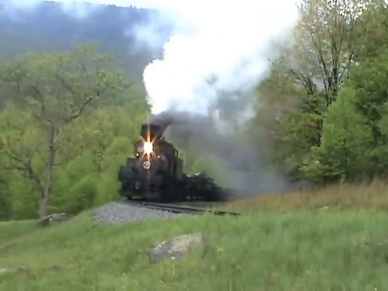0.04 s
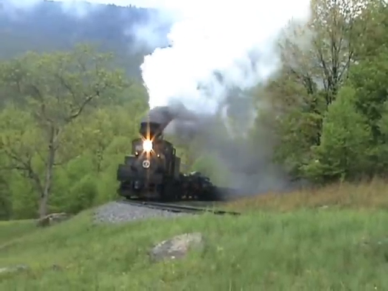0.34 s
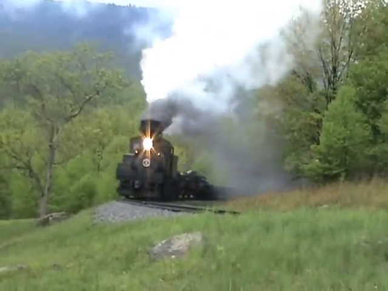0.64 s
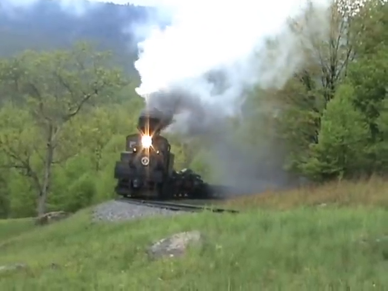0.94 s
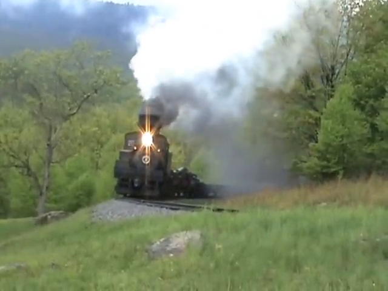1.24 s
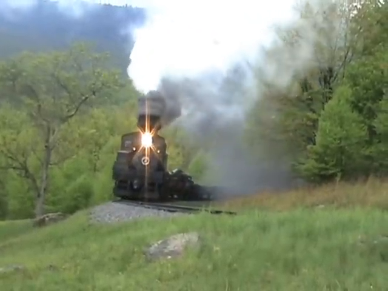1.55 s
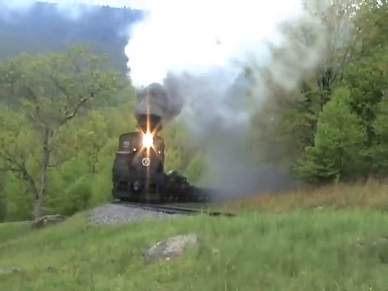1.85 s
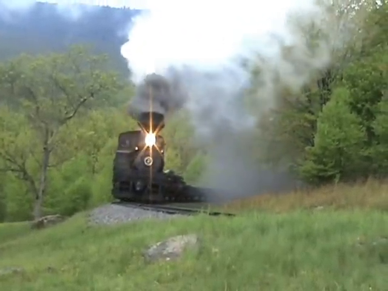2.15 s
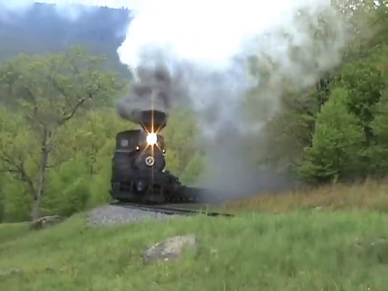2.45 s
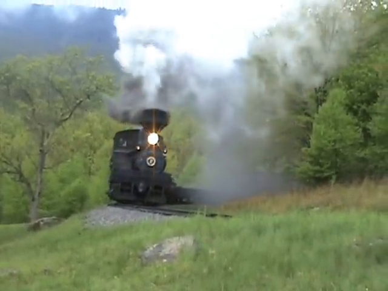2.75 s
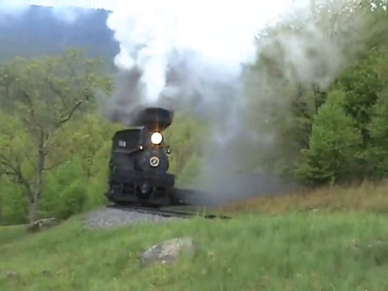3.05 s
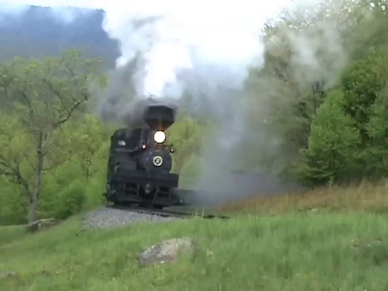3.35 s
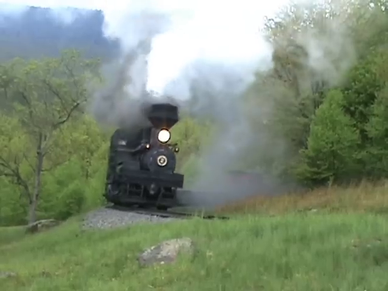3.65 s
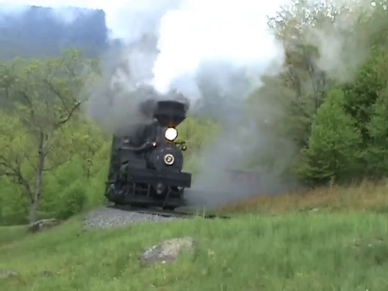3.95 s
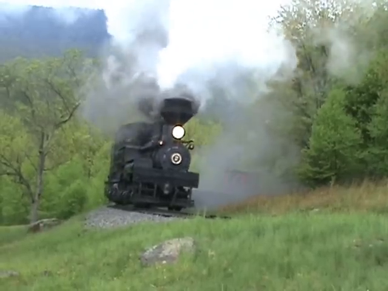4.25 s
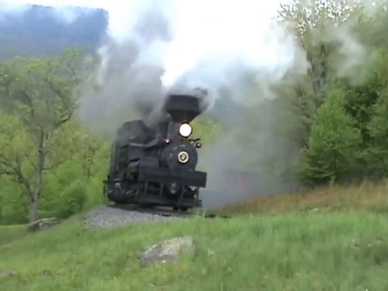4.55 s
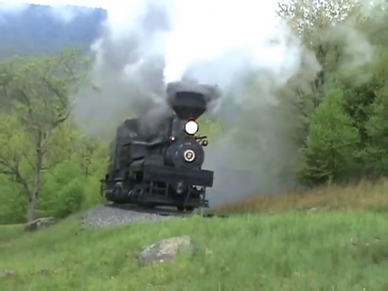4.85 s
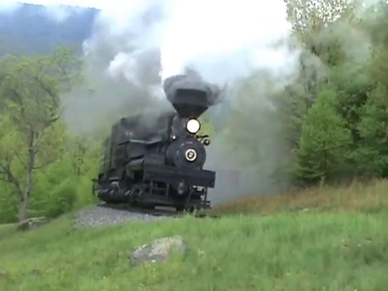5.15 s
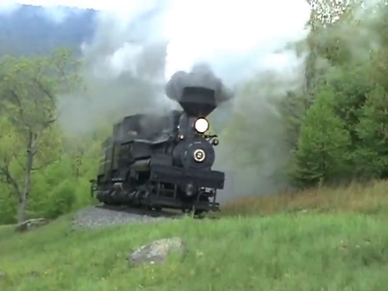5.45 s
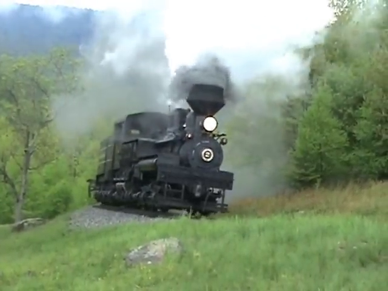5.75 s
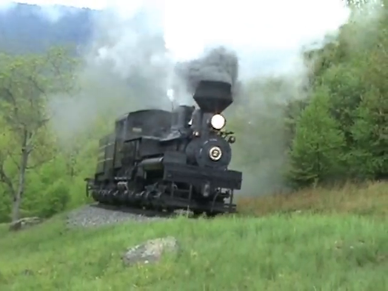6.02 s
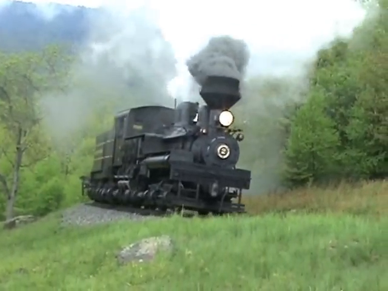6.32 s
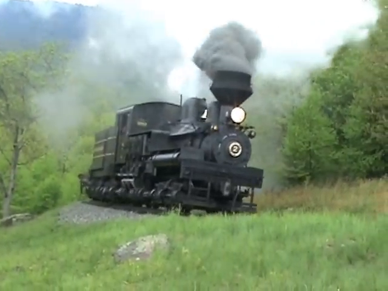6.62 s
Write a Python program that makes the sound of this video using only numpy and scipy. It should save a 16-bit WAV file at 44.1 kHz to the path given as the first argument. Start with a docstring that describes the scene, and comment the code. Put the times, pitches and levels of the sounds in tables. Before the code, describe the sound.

A loud, bright jet of steam from a locomotive hisses outdoors from the first moment and holds a nearly even level for about seven seconds, fluttering slightly. Beneath it lie a wide roar and a much quieter rumble of exhaust and running gear, with no separate chuffs. Throughout, the steam blows through the whistle, giving two broad, breathy tones that never settle into a clean note. The lower tone peaks in pitch just after 1 second, then sinks unevenly, ending a little lower by about 6 seconds. Higher, airy whistling bands flare within the hiss during the first two seconds and briefly near 3.4 seconds, then more often from about 4.5 seconds on. From around 6 seconds the two low whistle tones swell, still hoarse and noisy, while the steam keeps rushing to the end.

```python
"""A geared steam locomotive works up a grade towards a listener in a meadow.
From the start, a turbulent steam jet hisses from the boiler top over the rumble of exhaust and running
gear, and blows the whistle bell into broad, breathy resonances that never settle into a clean note.
After a second the lowest resonance peaks near 820 Hz, then sinks unevenly to about 720 Hz. In the last
two seconds the upper resonances flare more often, and at the end the two low ones swell."""
import sys
import numpy as np
from scipy import signal
from scipy.fft import irfft, next_fast_len
from scipy.io import wavfile

SR = 44100
rng = np.random.default_rng(int(sys.argv[2]) if len(sys.argv) > 2 else 0)


def wav_record(signal):
    """Record a signal, one row per channel, as 16-bit PCM in the file named by sys.argv[1]."""
    frames = np.transpose(np.atleast_2d(signal))
    bounded = np.clip(frames, -1, 1)
    # unit amplitude maps onto the largest positive 16-bit level
    quanta = np.round(bounded * 32767).astype(np.int16)
    wavfile.write(sys.argv[1], SR, quanta)


N = 298998
TIME = np.arange(N) / SR
FFT_SIZE = next_fast_len(N, True)
FREQS = np.maximum(np.arange(FFT_SIZE // 2 + 1) * SR / FFT_SIZE, 1)
STEP = 8   # samples per point of the coarse time grid
COARSE_TIME = np.arange(N // STEP + 2) * STEP / SR


def from_db(db):
    """Amplitude ratio of a level: a factor of ten per 20 dB."""
    return 10 ** (np.asarray(db) / 20)


def unit_power(x):
    """Normalisation by the root-mean-square value."""
    return x / np.sqrt(np.mean(np.abs(x) ** 2) + 1e-20)


def in_time(rows):
    """Linear interpolation of each column over time, one value per sample."""
    times, *columns = np.transpose(rows)
    return [np.interp(TIME, times, column) for column in columns]


def at_hz(points, hz):
    """Interpolation on a logarithmic frequency axis."""
    freqs, values = np.transpose(points)
    return np.interp(np.log(hz), np.log(freqs), values)


def share_below(edge_hz):
    """Power response of the low side of a soft crossover."""
    return 1 / (1 + (FREQS / edge_hz) ** 12)


def eddies(width_hz, count=1):
    """Turbulent fluctuation as band-limited complex noise: unit-power rows on the coarse grid."""
    run_in, rate = len(COARSE_TIME) // 4, SR / STEP
    lowpass = signal.butter(3, np.clip(width_hz / 2, 1, rate / 4), fs=rate, output="sos")
    white = rng.standard_normal((2, count, len(COARSE_TIME) + run_in))
    real, imag = signal.sosfilt(lowpass, white)[..., run_in:]
    return np.array([unit_power(row) for row in real + 1j * imag])


def flutter(width_hz, depth_db):
    """Random modulation by unsteady flow: a factor whose RMS swing is depth_db."""
    swing = unit_power(eddies(width_hz)[0].real)
    return np.interp(TIME, COARSE_TIME, from_db(depth_db * swing))


def spread(mid, side, hz, coherence):
    """Partial coherence: two independent noises mix into left and right, unequal in level and phase."""
    # level difference, left minus right: (frequency [Hz], level [dB])
    balance = [(100, 1.4), (400, 0.7), (750, 1.5), (1400, -1), (2300, 0), (4000, -1.2), (8000, -1.5),
               (11000, -1.5), (13500, -.3)]
    # phase lead of the left channel: (frequency [Hz], phase [rad])
    lead = [(50, .15), (350, 0.27), (700, .4), (1400, .13), (1900, .3), (2800, .1), (9000, .16),
            (15000, .05)]
    coherence = np.clip(coherence, -.999, .999)
    sign = np.array([[1], [-1]])
    pair = np.sqrt(1 + coherence) * mid + sign * np.sqrt(1 - coherence) * side
    return pair * from_db(sign * at_hz(balance, hz) / 2) * np.exp(1j * sign * at_hz(lead, hz) / 2)


def turbulence(gain):
    """Broadband flow noise: a random stereo spectrum shaped by gain, then scaled to unit power."""
    # likeness of left and right: (frequency [Hz], coherence [1])
    coherence = [(60, 0.88), (500, 0.9), (1780, 0.7), (2150, 0.84), (2500, 0.9), (2980, 0.79), (3280, 0.82),
                 (3900, 0.75), (7000, 0.82), (9500, 0.73), (10300, 0.37), (11800, .13), (14000, 0.74),
                 (15300, .95)]
    real, imag = rng.standard_normal((2, 2, len(FREQS)))
    mid, side = real + 1j * imag
    spectrum = spread(mid, side, FREQS, at_hz(coherence, FREQS)) * gain
    return unit_power(irfft(spectrum, FFT_SIZE)[:, :N])


def resonance(hz, width_hz, coherence=1):
    """A damped mode driven by turbulence gives a noise band about hz; a point source is coherent."""
    carrier = np.exp(2j * np.pi * np.cumsum(hz * np.ones(N)) / SR)
    mid, side = eddies(width_hz, count=2)
    envelopes = spread(mid, side, np.mean(hz), coherence)
    return unit_power(np.array([(np.interp(TIME, COARSE_TIME, ear) * carrier).real for ear in envelopes]))


def exhaust(beats_hz, depth_db):
    """Amplitude modulation: the geared engine's quick beats merge into a throbbing rumble."""
    # strength of exhaust and running gear: (time [s], relative level [dB])
    levels = [(0, -34.0), (0.8, -35.5), (1.6, -31), (3.3, -30.5), (3.7, -35), (4.15, -31), (5.4, -32.5),
              (5.9, -37), (6.78, -34.1)]
    # spectrum of the rumble: (frequency [Hz], relative level [dB])
    colour = [(15, -14), (30, -4), (45, -3.5), (80, 0.5), (150, 1.5), (200, -3.5), (245, -7), (320, -1.5),
              (420, -5), (520, -7), (700, 1.5), (1500, -51)]
    beat_count = np.cumsum(beats_hz * flutter(width_hz=1.4, depth_db=0.5)) / SR
    throb = from_db(depth_db * np.cos(2 * np.pi * beat_count))
    rumble = turbulence(from_db(at_hz(colour, FREQS)))
    return from_db(in_time(levels)[0] + 2.0) * throb * rumble


def plume_roar(start_db, fade_db_per_s):
    """An extended source is only partly coherent: the wide plume's roar, fading as the engine nears."""
    return from_db(start_db - fade_db_per_s * TIME) * resonance(1240, width_hz=1090, coherence=0.74)


def jet_levels():
    """A nearly steady flow sets the nominal levels in dB of the large, small and finest eddies."""
    # strength of the jet: (time [s], rush level [dB], sizzle level [dB])
    levels = [(0, -19.5, -17), (1.3, -18.4, -17.5), (2.4, -19.5, -17.0), (3.0, -19, -16.5),
              (3.35, -18.9, -16.5), (4.0, -19, -16.5), (4.35, -18.5, -15), (5.0, -18.5, -17),
              (5.6, -19.5, -15), (6.25, -19, -17.6), (6.78, -19, -15.5)]
    rush_db, sizzle_db = in_time(levels)
    hiss_db = -16.5 + 0.63 * (rush_db - rush_db.mean())   # follows part of the rush's swing
    return rush_db, hiss_db, sizzle_db


def steam_jet():
    """Turbulent mixing noise: smaller eddies radiate higher frequencies, from rush to hiss to sizzle."""
    # spectrum of the jet: (frequency [Hz], relative level [dB])
    jet_colour = [(1100, -18.5), (1800, -6.5), (2250, -2), (3300, -2.5), (4400, -2.5), (5500, -2),
                  (7000, -2), (8500, -4.5), (9600, -5), (10300, -9.5), (11500, -11.5), (13000, -15.5),
                  (16000, -20.5)]
    colour = from_db(at_hz(jet_colour, FREQS))
    rush_db, hiss_db, sizzle_db = jet_levels()
    below_hiss, below_sizzle = share_below(edge_hz=3440), share_below(edge_hz=6300)
    rush = from_db(rush_db - 1.0) * turbulence(colour * np.sqrt(below_hiss))
    hiss = from_db(hiss_db) * turbulence(colour * np.sqrt(np.abs(below_sizzle - below_hiss)))
    sizzle = from_db(sizzle_db - 0.73) * turbulence(colour * np.sqrt(1 - below_sizzle))
    sizzle *= flutter(width_hz=100, depth_db=0.6)
    # each size of eddy wanders on its own, and the whole jet surges
    jet = sum(band * flutter(width_hz=9.4, depth_db=0.65) for band in (rush, hiss, sizzle))
    return jet * flutter(width_hz=10.3, depth_db=0.35)


def whistle():
    """Forced resonance: the jet overblows the bell, exciting two strong low modes and weaker high ones."""
    # low modes: (time [s], first's frequency [Hz], first's relative level [dB], second's [dB])
    low_modes = [(0, 794, -24.6, -22.5), (0.75, 790.5, -31, -22.5), (1.15, 818.4, -23, -25),
                 (2.1, 763, -25.5, -27.5), (2.85, 788, -24, -29), (3.3, 781, -24, -24.0),
                 (4.15, 774.5, -24.4, -25), (4.9, 770, -27, -25), (5.25, 729, -25, -23.5),
                 (5.65, 728.5, -25.5, -26.5), (6.15, 719, -24.4, -22), (6.78, 739, -19.5, -20.5)]
    # upper modes: (frequency [Hz], bandwidth [Hz], level re the driving eddies [dB])
    upper_modes = [(2751, 545, -6), (3882, 520, -10.5), (4937, 390, -10.5), (5883, 420, -10),
                   (6900, 560, -11.5), (8100, 440, -14), (9400, 640, -21), (10700, 520, -21),
                   (14650, 600, -27)]
    first_hz, first_db, second_db = in_time(low_modes)
    bell = from_db(first_db - 0.96) * resonance(first_hz, width_hz=262)
    bell += from_db(second_db - 0.85) * resonance(1430, width_hz=384)
    bell *= flutter(width_hz=6.5, depth_db=0.5)
    drive_db = jet_levels()
    for hz, width_hz, level_db in upper_modes:
        band = np.searchsorted([3400, 6500], hz)   # rush, hiss or sizzle
        bell += from_db(drive_db[band] + level_db) * resonance(hz, width_hz)
    return bell


def whistle_flares():
    """Selective excitation: a resonance of the bell flares while the jet dwells on it."""
    # flares: (centre time [s], half length [s], frequency [Hz], glide [Hz/s], bandwidth [Hz], level [dB])
    flares = [(0.196, 0.31, 1210, 2, 190, -28.5), (.35, 0.454, 2540, 101, 360, -23.5),
              (1.13, 0.065, 3550, -1, 350, -24), (1.5, 0.73, 2250, -150, 280, -28),
              (3.36, .06, 3150, 5000, 700, -25), (4.847, 0.44, 6750, -1, 450, -27.5),
              (4.7, 0.46, 5920, 0, 300, -27.5), (5.42, .28, 2925, -0.5, 290, -24),
              (5.818, .14, 3680, 500, 260, -24), (6.08, 0.08, 5040, 0.5, 350, -23),
              (6.1, .25, 10160, 0, 1400, -28.5), (6.241, .2, 4110, 400, 300, -25),
              (6.64, 0.12, 5750, 1, 500.2, -21.5), (6.597, .7, 697, -1.5, 129, -29.3)]
    bell = np.zeros((2, N))
    for centre_s, half_s, hz, glide, width_hz, level_db in flares:
        envelope = 1 / np.sqrt(1 + ((TIME - centre_s) / half_s) ** 12)
        gliding_hz = hz + glide * np.clip(TIME - centre_s, -half_s, half_s)
        bell += from_db(level_db) * envelope * resonance(gliding_hz, width_hz)
    return bell


def scene():
    """Superposition of exhaust, plume, jet and whistle in open air."""
    background = exhaust(beats_hz=15.0, depth_db=0.5) + plume_roar(start_db=-26.3, fade_db_per_s=0.7)
    return background + steam_jet() + whistle() + whistle_flares()


def record(dry):
    """Clipping and band limiting: the rare highest peaks are flattened, then the top treble is cut."""
    cutoff_hz = 15780
    lowpass = signal.ellip(12, .1, 70, cutoff_hz, fs=SR, output="sos")
    return signal.sosfilt(lowpass, np.clip(dry, -1, 1))


dry = scene()
out = record(dry)
wav_record(out)
```